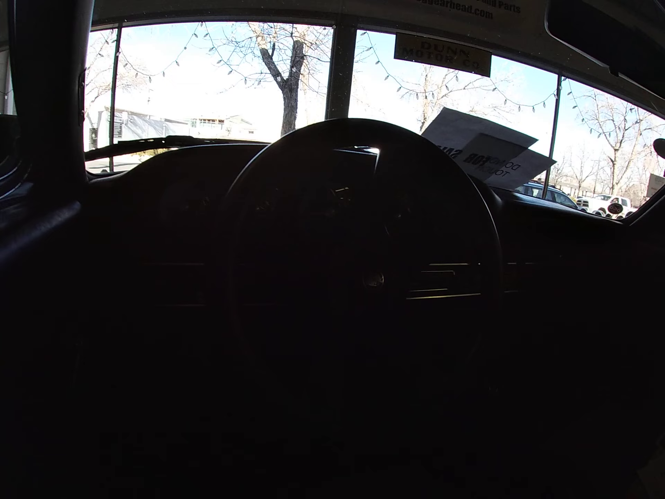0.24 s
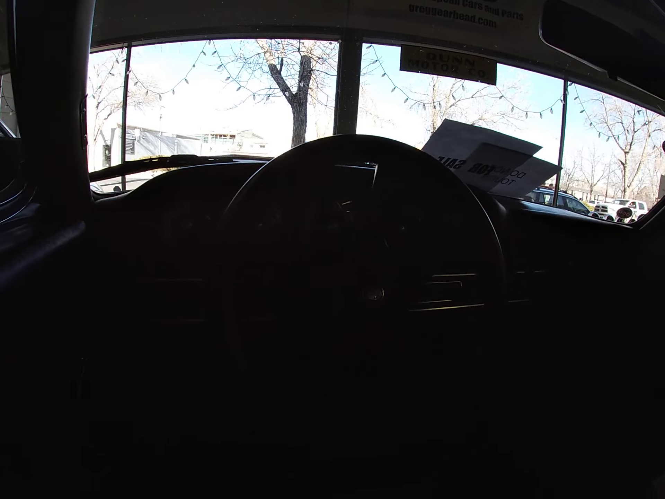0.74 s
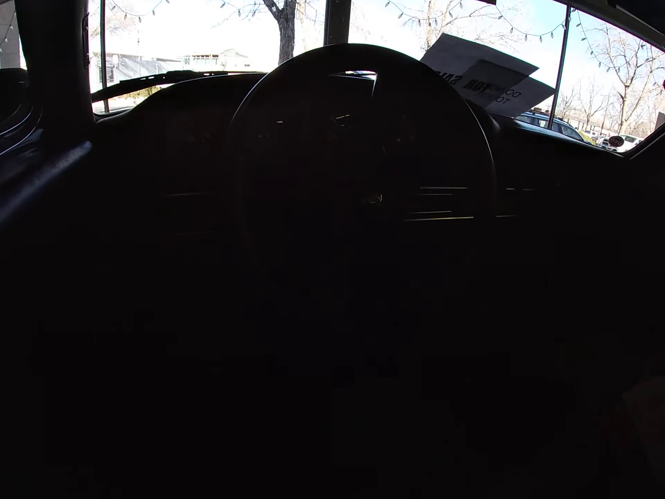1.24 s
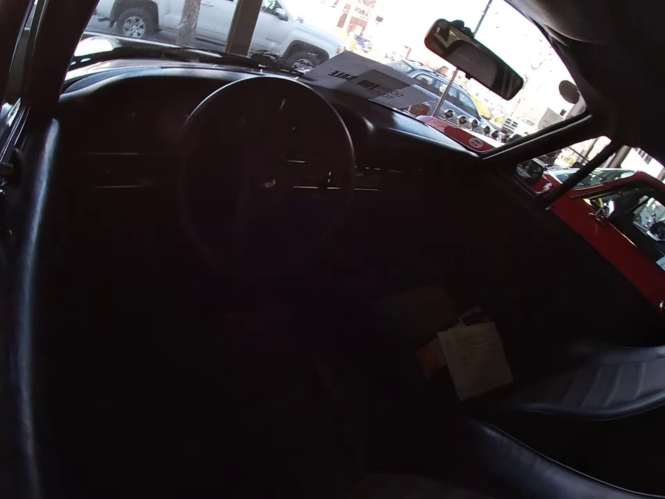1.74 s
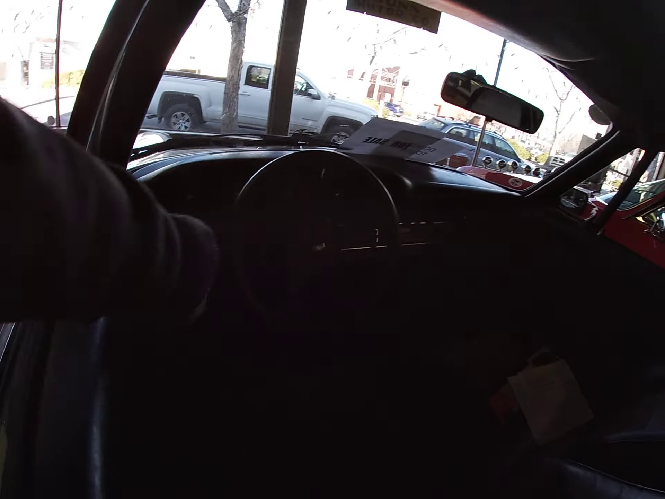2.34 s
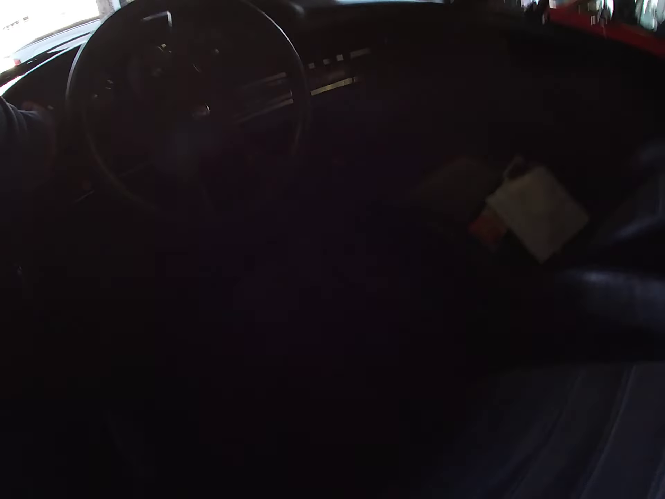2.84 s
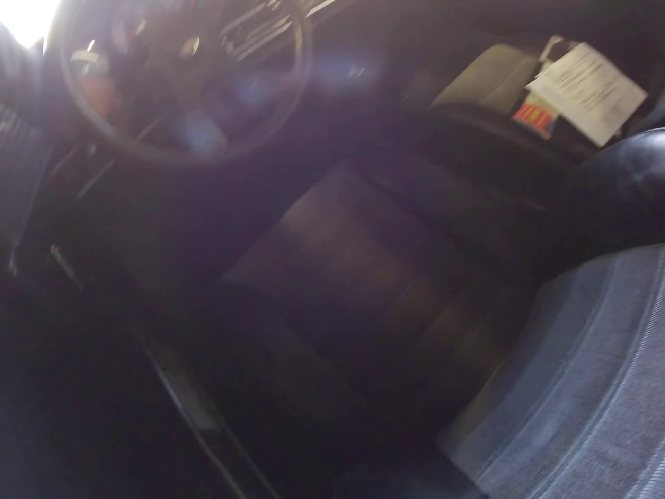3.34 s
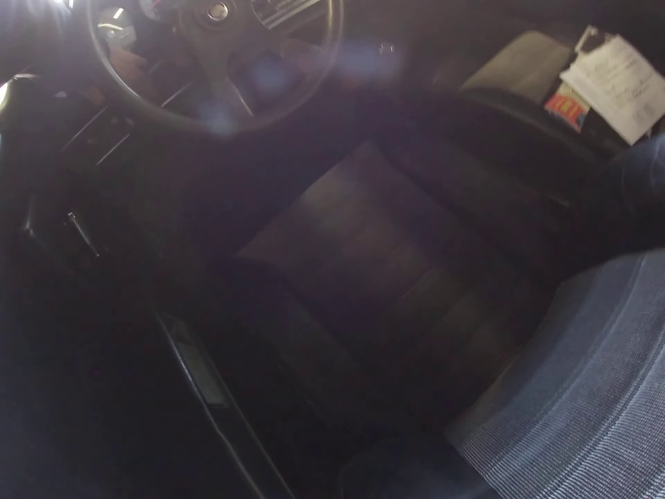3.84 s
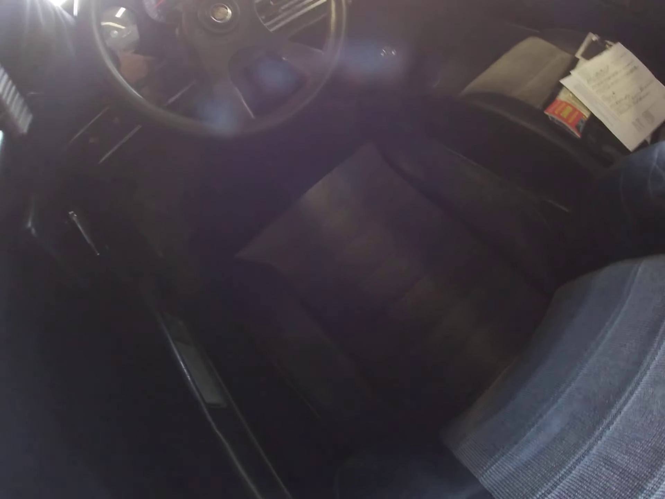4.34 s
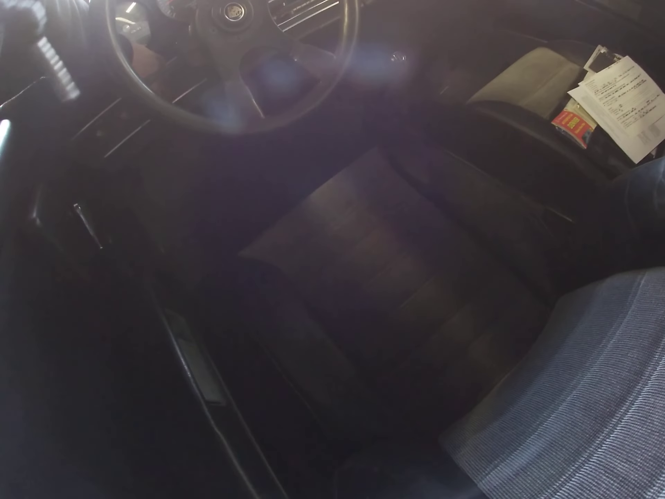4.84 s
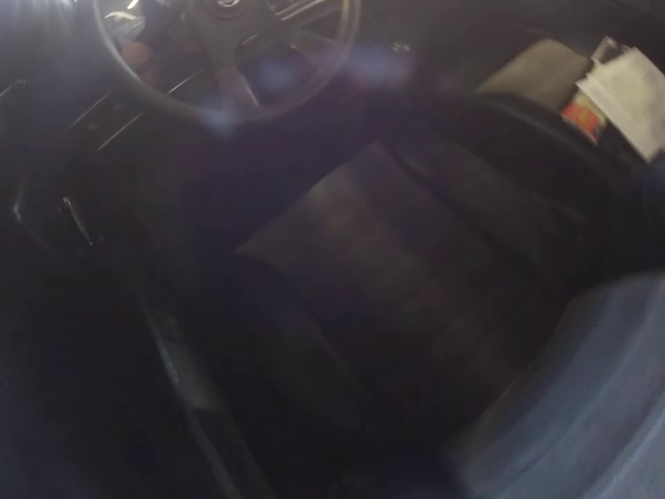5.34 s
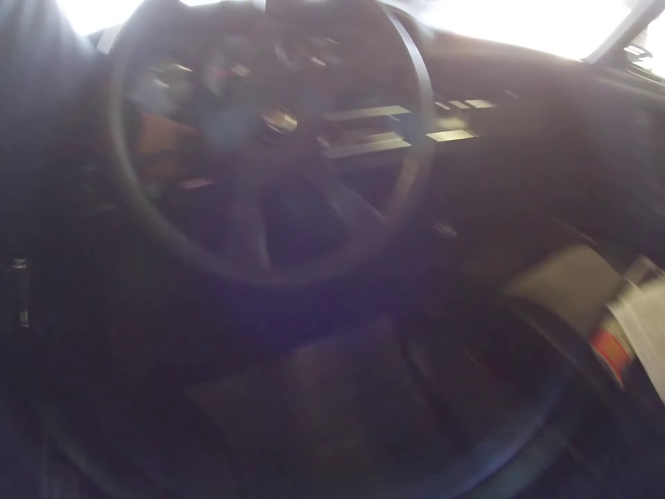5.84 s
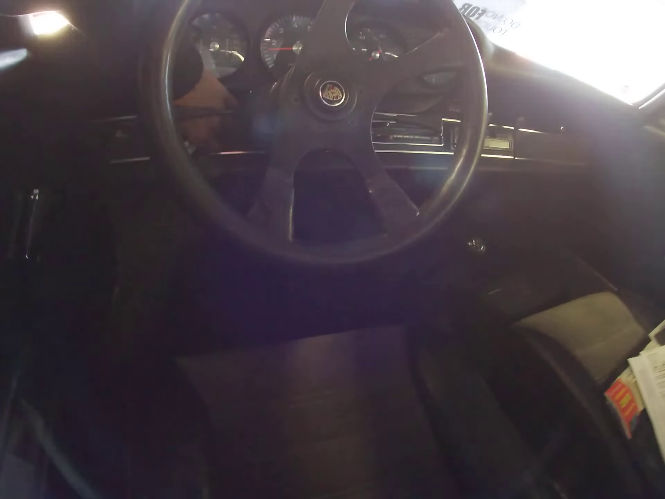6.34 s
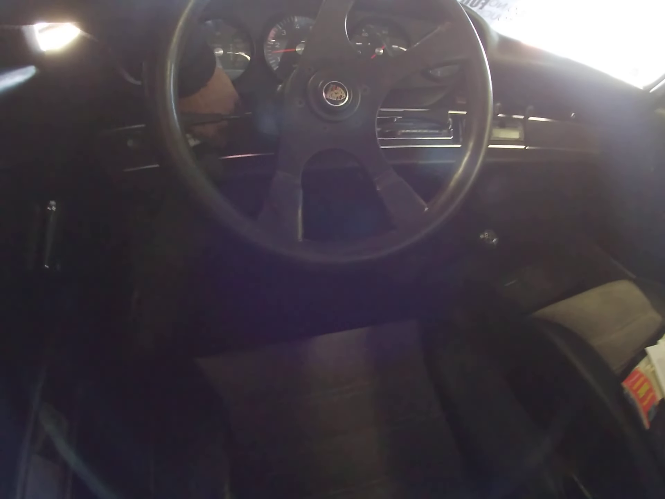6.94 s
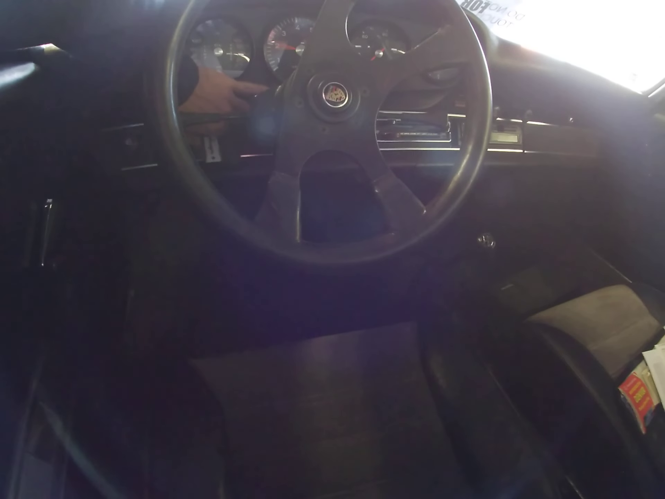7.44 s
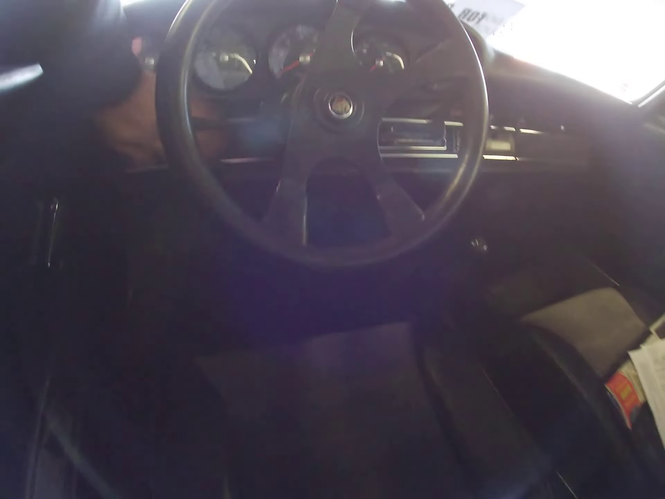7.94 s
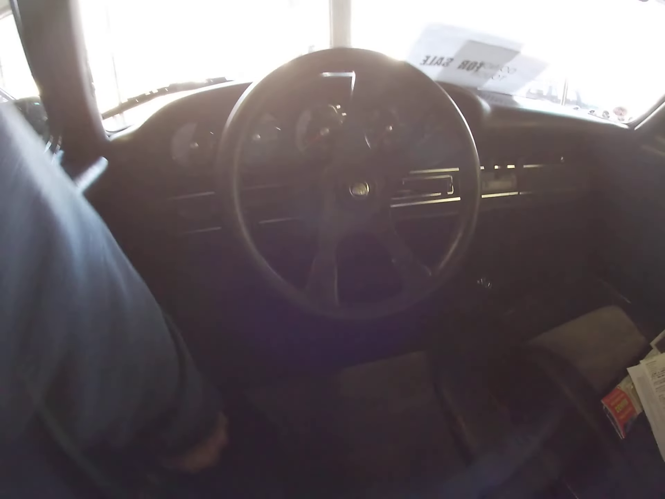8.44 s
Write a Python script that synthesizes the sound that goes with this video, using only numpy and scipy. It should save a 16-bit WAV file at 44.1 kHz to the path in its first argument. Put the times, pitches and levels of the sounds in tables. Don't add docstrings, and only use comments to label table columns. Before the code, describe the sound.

A small camera microphone sits inside a parked car while a six-cylinder air-cooled engine idles behind the cabin. From 0 s there is a low, throbbing exhaust boom, gently hunting up and down, with faint gear whine, tappet ticking and a steady fan rush. Around 1.5 to 2.5 s the door opens and the airy rush becomes louder and brighter; a soft thump comes near 1.9, then a duller closing thud and small ticks near 2.6. The idle continues, more enclosed, with faint key ticks and sleeve brushes around 3.3-4 and 5.3-5.6. After 5.75 the treble dulls slightly. A bright key click sounds at 7.07; at about 7.3 the engine cuts, whine and fan die rapidly, and final compressions thump until about 7.9. Switches click close by, strongest near 8.1, with light rustles and low bumps around 8.5, over a faint outdoor hush.

```python
import sys
import numpy as np
from scipy import signal
from scipy.fft import rfft, irfft, next_fast_len
from scipy.io import wavfile
from scipy.ndimage import uniform_filter1d

SR = 44100
rng = np.random.default_rng(int(sys.argv[2]) if len(sys.argv) > 2 else 0)


def volts_from_db(level):
    exponent = np.asarray(level, float) / 20
    return 10 ** exponent


def transcribe(signal):
    frames = np.atleast_2d(signal).T
    limited = np.clip(frames, -1, 1)
    pcm = np.round(limited * 32767).astype(np.int16)
    wavfile.write(sys.argv[1], SR, pcm)


N = 383669
IDLE_HZ, KEY_OFF_S = 36, 7.28

# [idle level/dB, slope/dB per Hz of revs, change when the spark is cut/dB, fade once stopped/dB per s]
ORDER_GROUPS = [
    (-26, 0, -5, -18),
    (-23.5, 0, -3.5, -30),
    (-30, .7, -14, -50),
    (-36, 2.5, -22, -40),
    (-41.5, -1.2, -19, -40),
]
# [t/s, level/dB]
DOOR_OPENING = [(0.0, -1), (.2, -.5), (.38, 2), (.6, 0), (.9, .6), (1.45, 2.5), (1.65, 5.5), (1.85, 7.8),
                (2.1, 8.3), (2.3, 6.3), (2.55, 6), (2.75, 2.3), (3.15, -1), (5.5, -.2)]


def level(x, db):
    return x * volts_from_db(db) / np.sqrt(np.mean(x ** 2))


def curves(table):
    s, *columns = np.transpose(table)
    return [np.interp(np.arange(N) / SR, s, c) for c in columns]


def walk(rate):
    step = 32
    held = int(SR / rate / step)
    slow = np.repeat(rng.standard_normal(N // step // held + 2), held)
    slow = uniform_filter1d(uniform_filter1d(slow, held), held)
    return 1.3 * np.interp(np.arange(N) / step, np.arange(len(slow)), slow)


def coloured(colour, lo_hz, hi_hz):
    size = next_fast_len(N)
    hz = np.arange(size // 2 + 1) * SR / size + 1
    colour_hz, colour_db = np.transpose(colour)
    shape = volts_from_db(np.interp(np.log(hz), np.log(colour_hz), colour_db))
    edges = 1 / np.sqrt((1 + (lo_hz / hz) ** 4) * (1 + (hz / hi_hz) ** 4))
    return irfft(rfft(rng.standard_normal(size)) * shape * edges, size)[:N]


def band(x, hz, width_hz):
    b, a = signal.iirpeak(hz, hz / (1.5 * width_hz), SR)
    return signal.lfilter(b, a, signal.lfilter(b, a, x))


def spells(rows):
    t = np.arange(0, N, 32) / SR
    bumps = (db * np.exp(-.5 * ((t - s) / length) ** 2) for s, db, length in rows)
    return np.repeat(sum(bumps, 0 * t), 32)[:N]


def spells_of(table, which):
    return spells(row[:3] for row in table if int(row[3]) == which)


def revs():
    # [t/s, firing rate/Hz]
    hunting = [(0, 35.7), (.55, 34.5), (.97, 36.3), (1.33, 36.4), (1.51, 35.1), (1.94, 35.5), (2.18, 37),
               (2.4, 36.7), (2.68, 34.6), (3.13, 36.6), (3.68, 36.1), (3.92, 35), (4.33, 36.5),
               (4.95, 36.1), (5.4, 36.8), (5.95, 36.2), (6.28, 37.1), (6.7, 35.1)]
    sag_hz_per_s, rock_hz = 42, 11.5
    flare_hz_per_s = 5.5
    t, idle = np.arange(N) / SR, curves(hunting)[0]
    surge_s = hunting[-1][0]
    idle = idle + flare_hz_per_s * np.clip(t - surge_s, 0, KEY_OFF_S - surge_s)
    fall = uniform_filter1d(idle, size=SR // 12) - sag_hz_per_s * np.maximum(t - KEY_OFF_S, 0)
    return np.maximum(fall, rock_hz), np.maximum(rock_hz - fall, 0) / sag_hz_per_s


def boom_levels(hz, stopped_s):
    # [t/s, level/dB, length/s, order group]
    combustion = [(.13, -14, .06, 1), (.45, 6, .18, 1), (.9, -14, .04, 1), (1.3, 3, .12, 1),
                  (1.52, -4, .08, 1), (2.07, 5, .12, 1), (2.47, 6, .09, 1), (2.72, -6, .07, 1),
                  (2.96, -13, .04, 1), (3.12, 3, .06, 1), (3.4, -5, .06, 1), (3.8, -4, .08, 1),
                  (5.7, -5, .2, 1), (5.95, -14, .04, 1), (6.25, 3, .07, 1), (6.47, -10, .06, 1),
                  (6.72, 6, .09, 1), (6.95, -9, .03, 1), (.13, -5, .05, 2), (.9, -5, .05, 2),
                  (2.0, -14, .04, 2), (2.61, -6, .04, 2), (6.66, -6, .03, 2), (6.95, -10, .025, 2),
                  (7.2, -8, .03, 2), (.45, 3, .1, 2), (2.1, 4, .5, 4), (.4, 2, .25, 4), (6.8, -4, .3, 4),
                  (1.7, -2, .2, 2), (2.95, -5, .04, 2), (3.78, -5, .04, 2), (4.21, -6, .04, 2),
                  (5.93, -6, .04, 2), (6.1, 3, .05, 2), (6.24, -3, .05, 2), (6.81, 1.5, .04, 2),
                  (7.08, 2, .04, 2), (.59, -8, .05, 3), (1.5, -2.5, .06, 3), (2.2, 4, .15, 3),
                  (2.52, -8, .03, 3), (4.0, -4, .18, 3), (6.65, -5, .06, 3), (.12, -3, .06, 3),
                  (2.73, -18, .06, 3), (7.2, -12, .07, 3), (.4, -4, .4, 0), (5.45, 2.5, .2, 0)]
    # [t/s, level/dB]
    strokes = [(7.35, 5), (7.42, 8), (7.47, 4), (7.54, 8), (7.62, -8), (7.68, -8), (7.755, 8), (7.82, -3),
               (7.87, 8), (8.06, 6), (8.13, 4), (8.28, 5)]
    spark_fade_s, stroke_s = .08, .025
    cut = np.clip((np.arange(N) / SR - KEY_OFF_S) / spark_fade_s, 0, 1)
    out = []
    for group, (db, slope, cut_db, fade) in enumerate(ORDER_GROUPS):
        running_db = db + slope * (hz - IDLE_HZ) * (1 - cut)
        out.append(running_db + cut_db * cut + fade * stopped_s + spells_of(combustion, group))
    out[1] = out[1] + spells((s, db, stroke_s) for s, db in strokes)
    return out


def firings(turns):
    size = rng.standard_normal(N // 200)[(2 * turns).astype(int)]
    puff = np.exp(-(2 * turns % 1) / .3) * volts_from_db(2.5 * size) * rng.standard_normal(N)
    scatter_db = .9 * uniform_filter1d(size, size=300)
    return scatter_db, level(band(puff, 330, 160), -53)


def exhaust(turns, order_db):
    # [multiple of the firing rate, level against the group/dB, order group]
    orders = [(2 / 3, -12.5, 0), (.89, -3, 0), (1, -4.5, 0), (7 / 6, -9, 0), (2, 0, 1), (5 / 3, -20.5, 1),
              (3, -8, 2), (8 / 3, -15, 2), (10 / 3, -15.5, 2), (4, 0, 2), (5, 0, 4), (16 / 3, -20.5, 3),
              (6, 0, 3), (7, -13, 4), (8, -13, 4)]
    out = 0
    for multiple, db, group in orders:
        waver = np.clip(-db / 8, .36, 1.2)
        start = rng.random() * (multiple % 2 > 0) + 1 / 2
        drift = .09 * waver * walk(9) + .08 * walk(2.5)
        tone = np.sqrt(2) * np.sin(2 * np.pi * (multiple * turns + start + drift))
        out = out + volts_from_db(db + order_db[int(group)] + 2.5 * waver * walk(8)) * tone
    lumps = level(band(rng.standard_normal(N), 34, 26), -9)
    scatter_db, knock = firings(turns)
    knock = knock * volts_from_db(order_db[4] - ORDER_GROUPS[4][0])
    return out * volts_from_db(scatter_db) + lumps * volts_from_db(order_db[0]) + knock


def shade():
    turn_away_s, shade_db = 5.75, -3
    return shade_db * np.clip((np.arange(N) / SR - turn_away_s) / .15, 0, 1)


def tooth_tone(multiple, turns, ripple):
    blur = ripple * walk(40) + .002 * multiple * np.sin(2 * np.pi * turns / 3)
    flicker_db = 2.1 * walk(4) + 2.6 * walk(16)
    return np.sqrt(2) * volts_from_db(flicker_db) * np.sin(2 * np.pi * (multiple * turns + blur + rng.random()))


def whine(roar_db, turns, hz):
    # [multiple of the firing rate, level against its panel/dB, panel]
    low_tones = [(9.33, -6, 0), (9.68, -1, 0), (18.8, -4.5, 1), (19.6, -4, 2)]
    # [level/dB, resonance/Hz, width/Hz, share of door, share of shade]
    whine_panels = [(-47.5, 334, 10, .5, .6), (-48.3, 660, 45, 0, 1.1), (-48.5, 712, 16, 0, 1.4)]
    # [multiple of the firing rate, level against the roar/dB]
    high_tones = [(13.0, -20), (15.0, -15), (24.0, -19), (28.1, -12), (31.8, -17), (37.4, -13.5),
                  (55.6, -16), (73.5, -23), (106.5, -27)]
    # [t/s, level/dB, length/s, panel 0-2 or upper tone 3 and up]
    gear_load = [(.25, 5, .2, 0), (1.1, -5, .12, 0), (1.6, 6, .2, 0), (1.95, 5, .06, 0), (2.15, -4, .08, 0),
                 (2.55, 4, .06, 0), (4.0, 3, .1, 0), (5.2, 4, .3, 0), (.15, 2, .05, 1), (.6, 4, .2, 1),
                 (1.55, -4, .12, 1), (2.25, -6, .07, 1), (2.5, 4, .07, 1), (3.4, 2, .25, 1),
                 (3.8, -8, .05, 1), (4.15, -3, .08, 1), (5.6, 3, .3, 1), (2.7, 3, .15, 1), (1.15, 3, .2, 2),
                 (2.25, -5, .15, 2), (6.3, -5, .3, 2), (2.25, -3, .12, 4), (4.8, 3, .2, 4), (2.3, 4, .6, 5),
                 (4.0, 4, .2, 5), (1.05, 4, .2, 6), (2.25, 4, .2, 6), (4.5, -4, .4, 6), (5.9, 4, .4, 6),
                 (2.15, 4, .2, 8), (6.75, 4, .12, 8), (1.63, 7, .08, 9), (3.6, 4, .25, 9),
                 (4.75, 1.5, .35, 9)]
    out = 0
    for multiple, db, which in low_tones:
        panel_db, panel_hz, width_hz, door, turn = whine_panels[int(which)]
        panel = 1 / np.sqrt(1 + ((multiple * hz - panel_hz) / width_hz) ** 2)
        tone_db = db + panel_db + spells_of(gear_load, int(which))
        tone_db = tone_db + door * curves(DOOR_OPENING)[0] + turn * shade()
        out = out + panel * volts_from_db(tone_db) * tooth_tone(multiple, turns, .115)
    for k, (multiple, db) in enumerate(high_tones):
        tone_db = db + spells_of(gear_load, k + len(whine_panels)) + roar_db + 1.2 * shade()
        out = out + volts_from_db(tone_db) * tooth_tone(multiple, turns, .085)
    return out * np.clip((7.36 - np.arange(N) / SR) / .2, 0, 1)


def rush_levels(hz, stopped_s):
    door = curves(DOOR_OPENING)[0]
    slow = np.log2(np.minimum(hz / (IDLE_HZ - 2), 1))
    dying = -70 * stopped_s
    treble_db = -54 + 1.25 * door + shade() + 19 * slow + dying
    roar_db = -44 + door + 14 * slow + dying
    return treble_db, roar_db


def fan(turns, hz, stopped_s):
    # [f/Hz, level/dB per Hz]
    rush_colour = [(300, 1), (430, -3.5), (620, -6), (800, -5), (1050, -2), (1260, -4), (1380, -2.5),
                   (1550, -7), (1900, -9.5), (2200, -11), (3000, -13), (5000, -18.5), (8000, -22.5),
                   (15000, -36)]
    rumble_colour = [(40, 0), (100, -6), (160, -12), (250, -19), (400, -24)]
    # [f/Hz, width/Hz, level/dB]
    humming_panels = [(410, 50, -57), (470, 18, -60), (543, 22, -53.5), (878, 25, -61), (1035, 20, -59.5),
                      (1095, 25, -56.5), (1160, 35, -60), (1320, 25, -62), (1515, 25, -67), (1680, 35, -64)]
    treble_db, roar_db = rush_levels(hz, stopped_s)
    door_db = np.where(roar_db > -44, .5, 1) * (roar_db + 44)
    throb = 1 + .1 * np.sin(2 * np.pi * turns / 3) + .06 * np.sin(2 * np.pi * 5 * turns / 3)
    gust_db = .35 * walk(18)
    rumble_db = np.clip(np.where(door_db > 0, .9, 2.1) * door_db, -18, 20) - 18 * stopped_s
    rumble = level(coloured(rumble_colour, 50, 380), -36.2) * volts_from_db(rumble_db + 1.2 * walk(10))
    low = level(coloured(rush_colour, 300, 900), -45.3) * volts_from_db(door_db + 1.1 * walk(20))
    air = rng.standard_normal(N) * volts_from_db(door_db)
    for panel_hz, width_hz, db in humming_panels:
        low = low + level(band(air, panel_hz, width_hz), db) * volts_from_db(2.5 * walk(3))
    roar = level(coloured(rush_colour, 900, 2400), -1.3) * volts_from_db(roar_db + .8 * walk(25))
    high = level(coloured(rush_colour, 2400, 20000), 2.8) * volts_from_db(treble_db + .8 * walk(40))
    taps = volts_from_db(5 * rng.standard_normal(N // 100))[(4 * turns).astype(int)]
    taps = taps * np.exp(-(4 * turns % 1) / .2)
    high = high * (.84 + .25 * taps)
    return rumble + throb * volts_from_db(gust_db) * (low + roar + high) + whine(roar_db, turns, hz)


def street():
    # [f/Hz, level/dB per Hz]
    hush_colour = [(60, -6), (185, 0), (262, -24), (400, -30), (550, -29), (840, -25), (1400, -28),
                   (2850, -31), (6800, -29.5), (15000, -34)]
    return level(coloured(hush_colour, 100, 20000), -55) * volts_from_db(1.5 * walk(6))


def thumps():
    # [t/s, peak/dB, f/Hz, t60/s]
    blows = [(1.91, -17.5, 95, .25), (2.58, -17, 22, .35), (2.6, -21, 48, .25), (7.3, -21, 108, .25),
             (7.41, -25, 118, .2), (7.555, -17.5, 84, .35), (7.64, -19, 64, .5), (7.68, -31, 140, .25),
             (7.79, -20, 62, .35), (7.88, -27, 75, .2), (7.96, -29, 56, .2), (8.35, -36, 670, .1),
             (7.945, -40, 620, .1), (7.997, -43, 530, .2), (7.91, -42, 850, .1), (8.084, -38, 570, .15),
             (8.352, -42, 220, .08), (8.405, -51, 650, .15), (8.402, -33, 100, .08), (8.425, -39, 340, .1),
             (8.432, -29, 145, .09), (8.446, -27, 150, .08), (8.486, -33, 430, .1), (8.488, -38, 650, .1),
             (8.48, -30, 110, .06), (8.491, -19, 125, .06), (8.51, -26, 110, .12), (8.52, -44, 450, .06),
             (7.18, -32, 350, .4), (8.5, -22, 30, .25), (8.53, -50, 1300, .06), (8.618, -20, 26, .14),
             (8.265, -24, 28, .2), (8.55, -38, 120, .25), (7.95, -38, 190, .4), (8.06, -40, 160, .4),
             (7.46, -24, 150, .12), (7.33, -23, 145, .12)]
    out, t = np.zeros(N + SR), np.arange(SR // 2) / SR
    for s, db, hz, t60 in blows:
        push = (1 - np.exp(-t * min(hz, 150) * 2.4)) ** 2
        shape = push * np.exp(-np.log(1000) * t / t60)
        mode = np.sin(2 * np.pi * hz * t) * min(200 / hz, 1)
        rough = level(band(rng.standard_normal(len(t)), hz, .5 * hz), -9)
        i = int(s * SR)
        out[i:i + len(t)] += volts_from_db(db) * shape * (mode + rough * np.clip(hz / 250, .3, 1))
    return out[:N]


def clicks():
    # [t/s, level/dB, centre f/Hz, t60/s]
    key_clicks = [(2.615, -33, 9500, .07), (2.67, -34, 10500, .04), (2.855, -38, 10000, .04),
                  (3.265, -50, 8000, .05), (3.305, -50, 8500, .05), (3.49, -40, 10500, .08),
                  (3.545, -42, 10500, .05), (5.345, -48, 9500, .05), (6.911, -48, 4500, .05),
                  (6.946, -45, 5500, .06), (6.975, -38, 4100, .09), (6.976, -37, 8800, .09),
                  (7.0653, -20.5, 5780, .075), (7.251, -40, 5000, .1), (7.287, -40, 5500, .1),
                  (7.375, -41, 7000, .1), (7.514, -48, 4200, .05), (7.574, -37, 6500, .09),
                  (7.663, -45, 6000, .08)]
    # [t/s, level/dB, centre f/Hz, t60/s, latch body against it/dB]
    latch_clicks = [(7.812, -42.5, 5000, .09, -4), (7.909, -37.5, 3700, .12, 2),
                    (7.911, -43, 8000, .08, -9), (8.083, -36, 6500, .1, 5), (7.997, -42, 7200, .09, -1),
                    (8.343, -48, 6500, .05, -9), (8.066, -54, 3200, .06, 8), (8.078, -28.5, 5150, .08, 3.5),
                    (8.139, -42, 5250, .09, 7), (8.35, -45, 6500, .1, 0), (8.488, -55, 4500, .2, 8)]
    # [f/Hz, width/Hz]
    key_modes = [(3010, 400), (3770, 400), (4200, 300), (4960, 300), (5770, 200), (6500, 500), (7200, 400),
                 (7900, 300), (9500, 900), (11500, 1500)]
    # [f/Hz, width/Hz, level/dB]
    latch_modes = [(575, 90, -5), (830, 200, -6), (1090, 120, -4), (1250, 120, -2), (1430, 180, 4),
                   (1800, 350, -2), (2150, 400, -5), (1300, 1400, 1), (2630, 400, -8)]
    key_body_db, hard_db = -10, -38
    out, t = np.zeros(N + SR), np.arange(SR // 6) / SR
    for s, db, centre_hz, t60, body_db in [(*row, key_body_db) for row in key_clicks] + list(latch_clicks):
        noise = rng.standard_normal((2, len(t)))
        rattle = noise * np.exp(-np.log(1000) * t / max(t60, .01)) * (1 + 1.1 * np.exp(-t / .002))
        rattle[:, 0] += 4, 9
        bright = .9 * band(rattle[0], centre_hz, 4500)
        for hz, width in key_modes:
            away = np.log(hz / centre_hz)
            if abs(away) < 3 / 4:
                bright = bright + band(rattle[0], hz, width) * np.sqrt(200 / width) * np.exp(-(away / .4) ** 2)
        body = 0
        for hz, width, mode_db in latch_modes:
            body = body + volts_from_db(mode_db) * band(rattle[1], hz, width) * np.sqrt(200 / width)
        hardness = np.clip((db - hard_db) / 20, 0, 1)
        ring = np.sin(2 * np.pi * centre_hz * t) * volts_from_db(-60 * t / .055) * .4 * hardness
        crack = volts_from_db(-8) * noise[1] * np.exp(-t / .003) / 2
        ringing = bright / np.abs(bright).max() + volts_from_db(body_db) * body / np.abs(body).max()
        i = int(s * SR)
        out[i:i + len(t)] += volts_from_db(db) * (crack + ring + ringing)
    return out[:N]


def rustles():
    # [t/s, level/dB, centre f/Hz, width/Hz, length/s]
    swishes = [(3.28, -65, 8000, 5000, .04), (3.58, -51, 4500, 5000, .025), (4.04, -58, 5500, 4000, .008),
               (5.35, -62, 9000, 5000, .02), (5.55, -57, 8500, 6000, .06), (5.63, -51, 6500, 7000, .025),
               (7.95, -53, 3000, 2500, .018), (7.955, -55, 900, 1100, .02), (8.03, -60, 1000, 1500, .025),
               (8.165, -57, 1100, 1200, .015), (7.86, -54, 900, 900, .03), (8.028, -58, 3000, 3000, .015),
               (8.42, -58, 1400, 500, .015), (8.64, -57, 2600, 2000, .015)]
    out, t = np.zeros(N), np.arange(-SR // 4, SR // 4) / SR
    for s, db, hz, width_hz, length in swishes:
        grains = rng.standard_normal(len(t)) * volts_from_db(2.1 * rng.exponential(size=len(t)))
        swish = level(band(grains, hz, width_hz), db) * np.exp(-.5 * (t / length) ** 2)
        i = int(s * SR) - SR // 4
        out[i:i + len(t)] += swish[:N - i]
    return out


def scene():
    hz, stopped_s = revs()
    turns = np.cumsum(hz) / SR
    engine = exhaust(turns, boom_levels(hz, stopped_s)) + fan(turns, hz, stopped_s)
    handling = thumps() + clicks() + rustles()
    return (engine + street() + handling)[None]


def low_pass(x):
    return signal.sosfilt(signal.butter(12, 15300, fs=SR, output="sos"), x)


def record(dry):
    mic_top_hz = 8800
    x = np.tanh(2.2 * dry) / 2.16
    x = signal.sosfilt(signal.butter(2, 14, "high", fs=SR, output="sos"), x)
    below_top = signal.sosfiltfilt(signal.butter(5, mic_top_hz, fs=SR, output="sos"), x)
    return low_pass(x * .045 + .955 * below_top)


dry = scene()
out = record(dry)
transcribe(out)
```